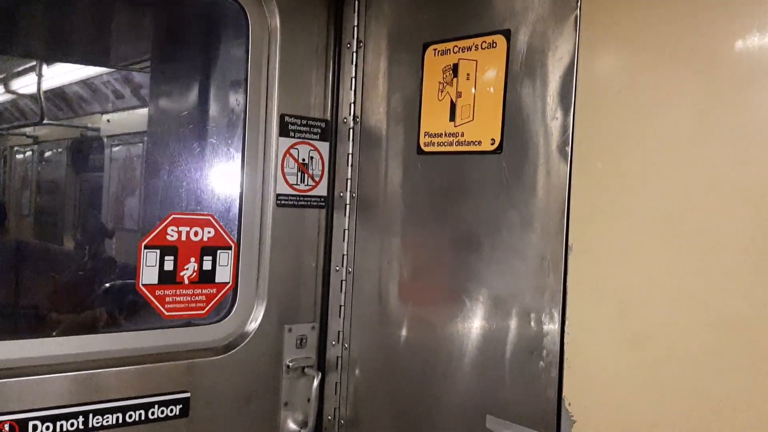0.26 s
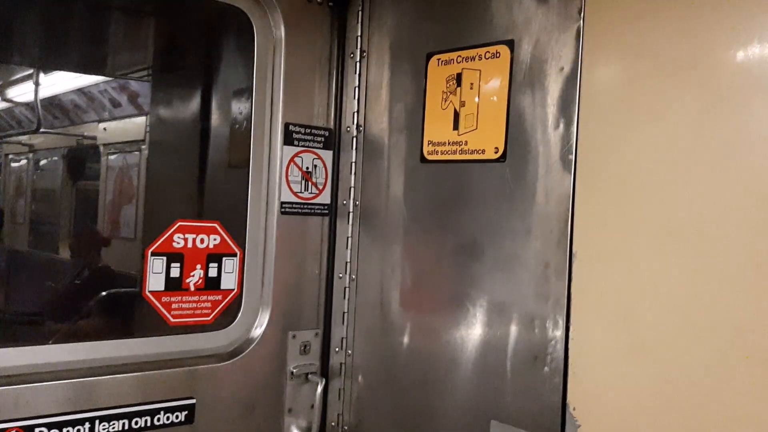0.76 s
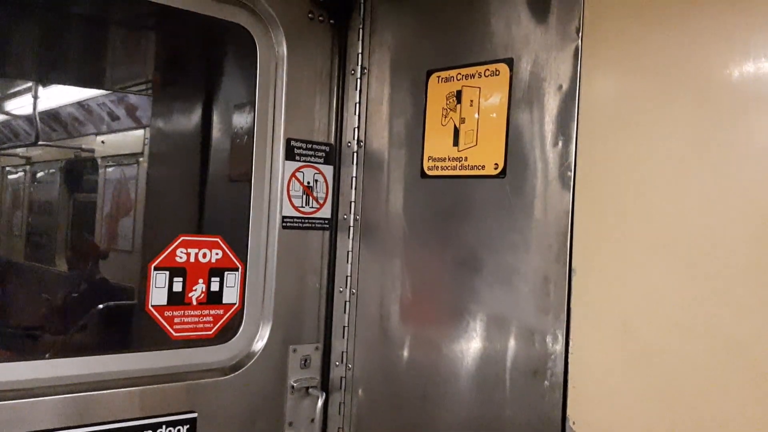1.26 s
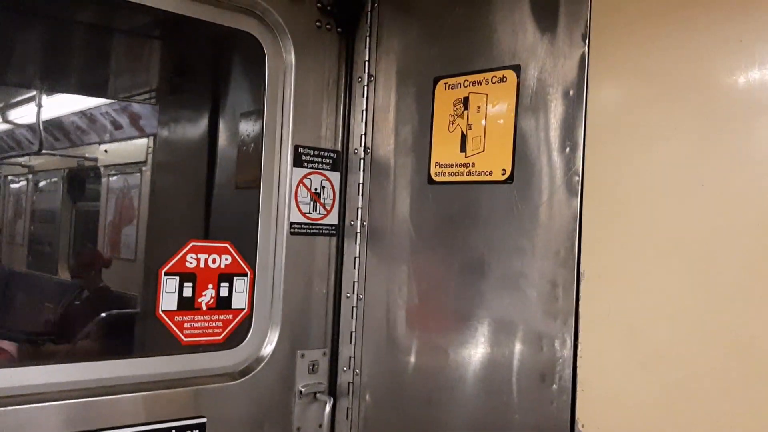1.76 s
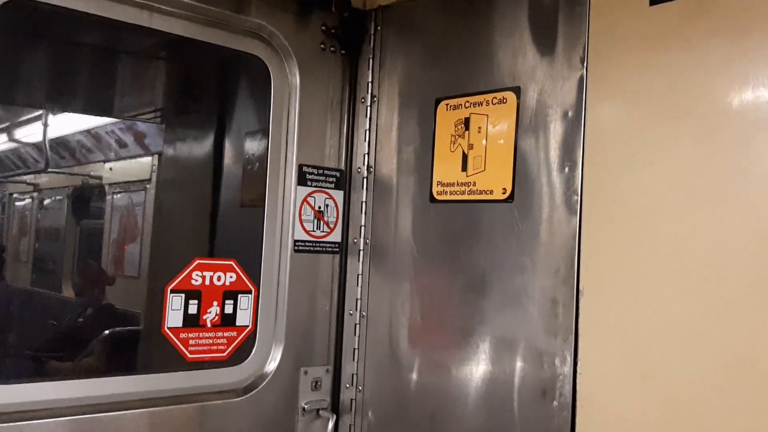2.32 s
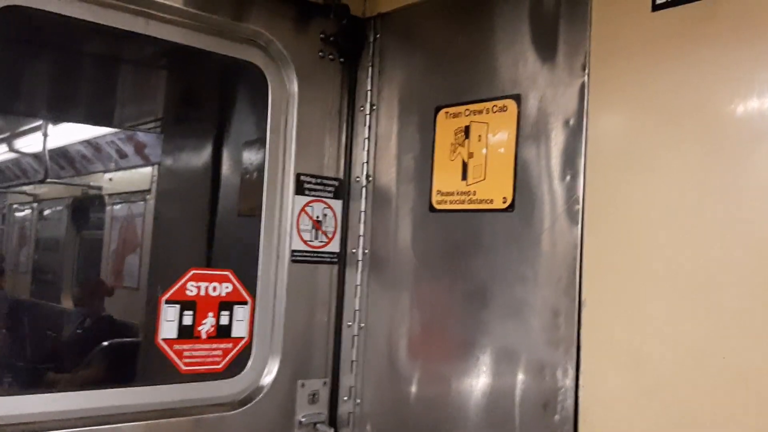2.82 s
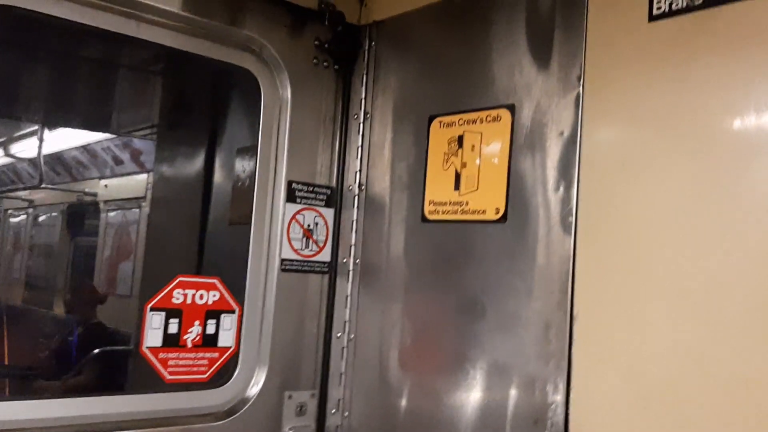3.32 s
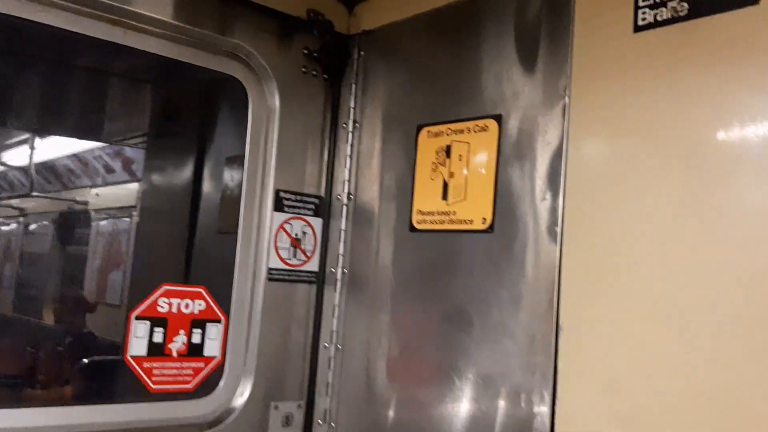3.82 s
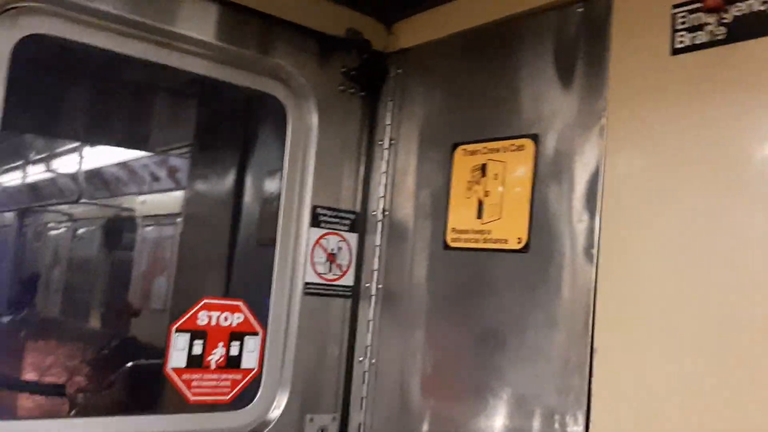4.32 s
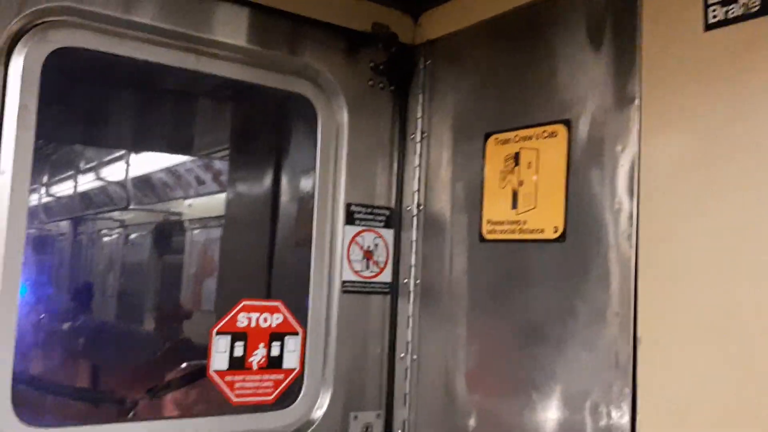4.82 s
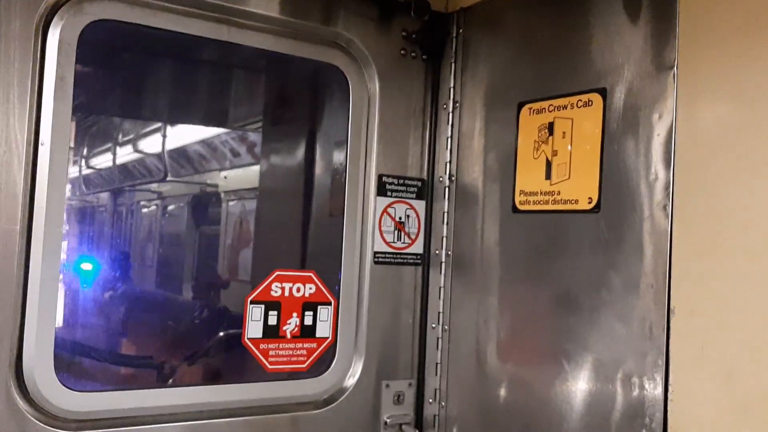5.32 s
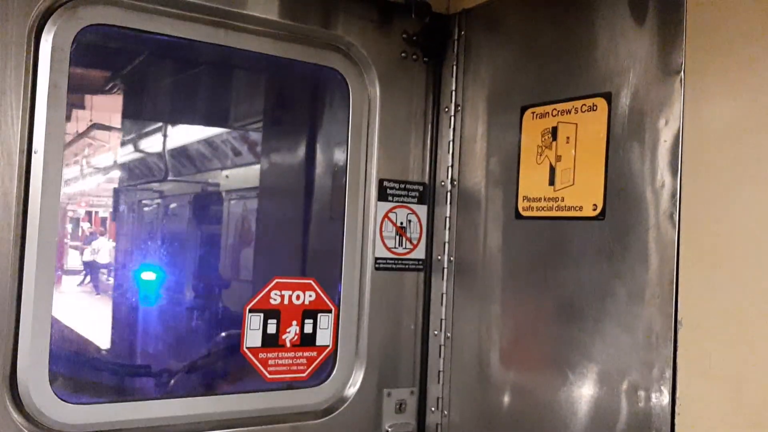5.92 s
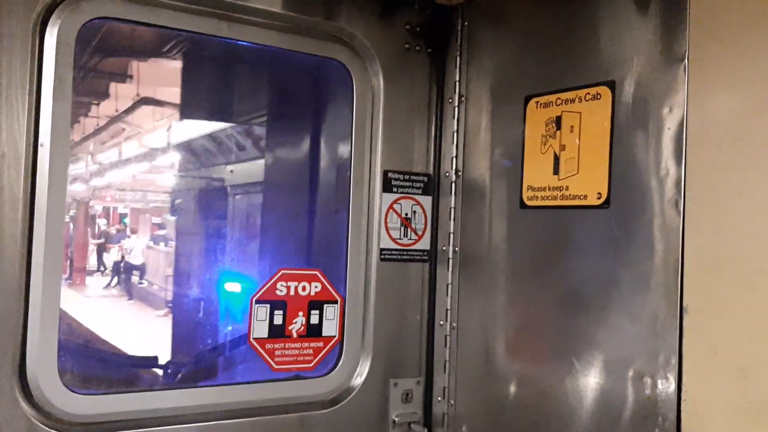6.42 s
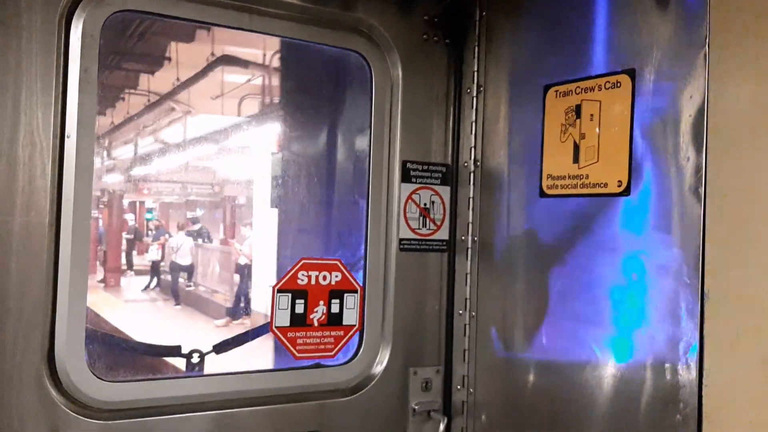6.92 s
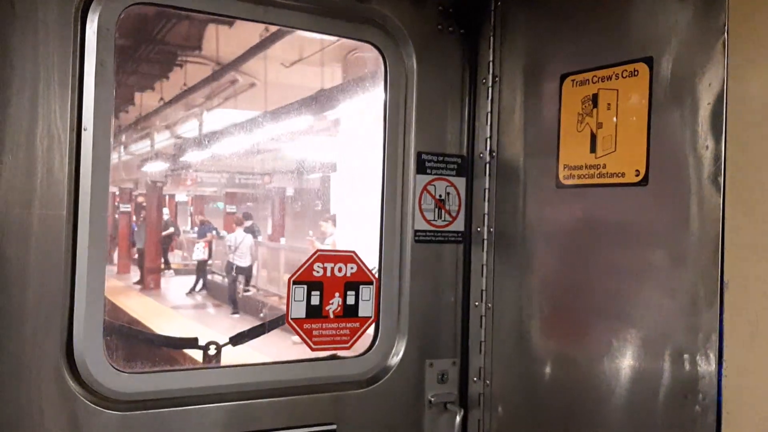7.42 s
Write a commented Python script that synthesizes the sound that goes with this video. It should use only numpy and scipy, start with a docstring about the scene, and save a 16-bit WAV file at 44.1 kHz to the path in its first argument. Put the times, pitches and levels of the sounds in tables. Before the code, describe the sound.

Inside a steel subway car by its end door, in wide stereo, a dense rumble runs throughout: deep sway, low axle drone, boomy body panels and mid-range rail roar. Over it lie a smooth ventilation hiss and thin high electric whines drifting between the ears. The first second is roughest: a hard double thump near 0.2 s, weaker blows at 0.5 and 0.8, another at 1.1, with ringing metal, rattles and a low unsteady groan from 0.3 to 1.0. A short rising groan follows around 1.3-1.4. Then the rail is smoother, with uneven surges and a hum near 1.9. A sharp spit of air and rattle comes at 1.7, light clicks and a tiny tick on the right near 3.2, another air spit at 4.3, a faint falling groan at 4.7 and a metallic rattle at 5.3. From about 5.4 the drone grows fuller entering the station, with brief hum pulses around 6.6-7.3, still rolling at 7.6.

```python
"""A deep rumble with joint thumps and groans, as heard by the end door of a steel subway car entering a station.
Filtered noise makes the car body's rumble, the tunnel roar and the ventilation hiss.
Joint blows gate noise and ring the bogie; gliding sines groan; steady sines whine in the power electronics.
Short noise bands make spits of air and rattling fittings; three dying sines make one sharp tick close on the right."""
import sys
import numpy as np
from scipy import signal
from scipy.fft import rfft, irfft, next_fast_len
from scipy.io import wavfile
from scipy.ndimage import uniform_filter1d

SR = 44100
rng = np.random.default_rng(int(sys.argv[2]) if len(sys.argv) > 2 else 0)


def log_audio(samples):
    """Write samples as a 16-bit WAV file to the path given in sys.argv[1]."""
    # one column per channel
    frames = np.atleast_2d(samples).T
    # limit to full scale, then quantise
    limited = np.clip(frames, -1, 1)
    pcm = np.round(limited * 32767).astype(np.int16)
    wavfile.write(sys.argv[1], SR, pcm)


N = 337806
TIME = np.arange(N) / SR  # seconds


def from_db(db):
    """Decibel law: 20 dB is a tenfold amplitude gain."""
    return np.exp(np.asarray(db) * (np.log(10) / 20))


def rms_one(x):
    """Power normalization: scale to a mean square of one."""
    return x / np.sqrt(np.mean(x ** 2) + 1e-20)


def in_time(rows):
    """Linear interpolation: each column of a timed table, read at every sample."""
    seconds, *columns = np.transpose(rows)
    return [np.interp(TIME, seconds, column) for column in columns]


def at_hz(points, hz):
    """Spectral interpolation: straight lines on a log-frequency axis."""
    point_hz, value = np.transpose(points)
    return np.interp(np.log(hz), np.log(point_hz), value)


def swells(rows):
    """Superposed bell-shaped gains in dB; each length is the width at half height."""
    gain_db = 0
    for peak_s, db, length in rows:
        widths = 2 * (TIME - peak_s) / length
        gain_db = gain_db + db * np.exp2(-np.minimum(widths ** 2, 20))
    return gain_db


def drift(rate):
    """Low-passed chance: a random curve of spread about 1, with two poles at `rate` Hz."""
    step = 100  # samples between points
    pole = np.exp(-2 * np.pi * rate * step / SR)
    chance = rng.standard_normal(N // step + 2002)
    slow = signal.lfilter([1], [1, -2 * pole, pole * pole], chance)[2000:]  # drop the filter's start
    return np.interp(np.arange(N) / step, np.arange(len(slow)), rms_one(slow))


# Resonances of car panels and ducts. Each row: frequency in Hz, width in Hz, peak gain in dB.
PANEL_RESONANCES = [(108.3, 6.3, 7.5), (160, 15, 2.5), (210, 22, 2), (1208, 12, 5.5), (1278, 8.8, 5),
                    (1540, 79, 4), (2042, 33, 6)]
# Likeness of the two ears. Each row: frequency in Hz, left-right correlation.
EAR_LIKENESS = [(60, 0.95), (99, 0.99), (160, 0.94), (270, 0.93), (450, 0.74), (740, 0.41), (1220, -0.014),
                (2010, -0.12), (3330, 0.12), (5500, -0.096), (9080, 0.045), (15000, 0.12)]
# Balance of the two ears. Each row: frequency in Hz, left minus right in dB.
EAR_BALANCE = [(50, 1), (140, 0), (1600, 0.5), (2100, 0.5), (2900, -3.5), (3900, -4.5), (5000, -1.5),
               (6600, 0.5), (7800, -4.5), (9500, -3), (11500, -9), (14000, 0.5)]


def cabin_noise(spectrum):
    """Random vibration through panel resonances: correlated ears in the bass, a diffuse field above."""
    size = next_fast_len(N)
    hz = np.maximum(np.fft.rfftfreq(size, 1 / SR), 1)
    panels_db = sum(db / (1 + (2 * (hz - f) / width) ** 2) for f, width, db in PANEL_RESONANCES)
    level_db = at_hz(spectrum, hz) + panels_db
    low_skirt = np.minimum(hz / spectrum[0][0], 1) ** 2
    high_skirt = np.minimum(spectrum[-1][0] / hz, 1) ** 3
    alike = np.clip(at_hz(EAR_LIKENESS, hz), -.99, .99)
    mid, side = rfft(rng.standard_normal((2, size)))
    sides = np.array([[1], [-1]])  # left, right
    pair = np.sqrt(1 + alike) * mid + sides * np.sqrt(1 - alike) * side
    pair = pair * from_db(sides * at_hz(EAR_BALANCE, hz) / 2)
    return rms_one(irfft(pair * from_db(level_db) * low_skirt * high_skirt, size)[:, :N])


def steadied(x, seconds):
    """Power leveling: divide a vibration by its running rms over `seconds`."""
    power = uniform_filter1d(np.mean(x ** 2, axis=0), max(int(seconds * SR), 1))
    return x / np.sqrt(power + 1e-9)


def burst(start, rise, t60):
    """Transient envelope: a linear rise, then an exponential decay of 60 dB in `t60` seconds."""
    age = TIME - start
    decay_db = -60 * np.maximum(age - rise, 0) / t60
    return np.clip(age / max(rise, 1e-4), 0, 1) * from_db(decay_db)


def bursts(rows, source):
    """Band-pass gating: each event lets its own band of the source through for a moment."""
    out = 0
    for start, db, rise, t60, low, high in rows:
        edges = [min(low, .9 * high), min(high, .45 * SR)]
        band = signal.butter(2, edges, "band", fs=SR, output="sos")
        out = out + from_db(db) * burst(start, rise, t60) * rms_one(signal.sosfilt(band, source))
    return out


# A bad stretch and then smooth rail. Each row: time in seconds, roughness in dB over smooth rail.
TRACK_ROUGHNESS = [(0, -1.5), (.19, 3.5), (.25, 3.5), (.62, 4), (.8, 1.5), (.92, 1), (1.02, -2.5),
                   (1.3, -.5), (2.33, -0.9), (3.2, .3), (5.0, -1.1), (5.5, -1.2), (6.2, 0.2), (7.66, -0.5)]


def track_db():
    """Rolling excitation: rougher rail drives the car harder."""
    return in_time(TRACK_ROUGHNESS)[0]


# Fixed resonances of the car body. Each row: frequency in Hz, width in Hz.
BODY_RESONANCES = [(215, 36), (275, 72), (335, 54), (400, 39), (465, 130)]


def wavering_modes(x, depth):
    """Varying modal excitation: each fixed body resonance swells and fades at random."""
    out = x
    for hz, width in BODY_RESONANCES:
        mode = signal.lfilter(*signal.iirpeak(hz, hz / width, fs=SR), x)
        out = out + depth * drift(5.0) * mode
    return out


# Spectrum of the body boom. Each row: frequency in Hz, relative level in dB per Hz.
BOOM_SPECTRUM = [(190, -35), (215, -10.5), (238, -8), (275, -1), (340, -3), (410, -2), (490, -8),
                 (580, -10.5), (800, -37.5)]
BOOM_DB = -25  # on smooth rail


def boom():
    """Forced panel vibration: rough rail drums the body, whose fixed resonances swell and fade at random."""
    drummed = wavering_modes(cabin_noise(BOOM_SPECTRUM), depth=0.2)
    return from_db(BOOM_DB + track_db()) * steadied(drummed, seconds=0.16)


# Spectrum of the rails' roar. Each row: frequency in Hz, relative level in dB per Hz.
ROAR_SPECTRUM = [(350, -7), (520, -4.5), (610, 2.5), (720, -0.5), (900, -1), (1080, -4), (1300, -3),
                 (1550, -7), (1800, -10.5), (2200, -11.5), (3200, -22)]
# Roar on the way to the station. Each row: time in seconds, level in dB.
ROAR_LEVEL = [(0, -28), (.19, -28.5), (.25, -28), (.55, -26), (1.02, -30.5), (2.05, -30.5), (3.05, -28),
              (4.0, -28.5), (4.85, -28), (4.96, -26.3), (5.1, -27.8), (6.3, -27.5), (7.66, -27.6)]


def roar():
    """Broadband rolling noise: the rails roar in the tunnel with a slight random flutter."""
    level_db, = in_time(ROAR_LEVEL)
    return from_db(level_db + 0.33 * drift(9.2)) * cabin_noise(ROAR_SPECTRUM)


# Spectrum of the axles' drone. Each row: frequency in Hz, relative level in dB per Hz.
DRONE_SPECTRUM = [(62, -19), (76, -7), (92, 1), (110, -1.5), (130, -2), (156, -6), (180, -26.5)]
# Drone over uneven rail. Each row: peak time in seconds, gain in dB (negative eases off), length in seconds.
DRONE_SURGES = [(.03, 8, 0.047), (.35, -1, .15), (.7, 5, 0.22), (.91, 4.5, .1), (1.11, 3, 0.087),
                (1.27, 3.5, 0.12), (1.85, -0.5, 0.14), (2.11, 3.5, 0.16), (2.34, 3, 0.09), (2.5, 4.5, .16),
                (2.87, -2, 0.12), (3.55, 1, .1), (3.85, -1.5, .15), (4.31, 5, 0.13), (4.87, -4, 0.086),
                (5.48, 5.5, 0.13), (5.8, 3, 0.16), (6.27, 4, 0.071), (6.47, -0.5, 0.16), (6.86, 2.5, 0.14),
                (7.07, -5, .08), (7.47, 2.5, .16)]
DRONE_DB, DRONE_FOLLOWS = -30, 0.43  # level on smooth rail, share of the track's roughness in dB
STATION_S, STATION_FADE_S, STATION_DRONE_DB = 5.45, .3, 2  # middle of the fade, its length, gain


def drone():
    """Narrow-band forced vibration: the axles drone with the rail, louder from the station's mouth on."""
    in_station = np.clip((TIME - STATION_S) / STATION_FADE_S + .5, 0, 1)
    level_db = DRONE_DB + DRONE_FOLLOWS * track_db() + swells(DRONE_SURGES)
    level_db = level_db + STATION_DRONE_DB * in_station
    return from_db(level_db) * steadied(cabin_noise(DRONE_SPECTRUM), seconds=0.16)


# Spectrum of the floor, between drone and boom. Each row: frequency in Hz, relative level in dB per Hz.
THRUM_SPECTRUM = [(128, -12.5), (152, 0.5), (172, -3.5), (195, -0.5), (220, -3), (255, -8), (290, -16.5)]
# Changing load on the wheels. Each row: peak time in seconds, gain in dB, length in seconds.
THRUM_SWELLS = [(.04, 5, .1), (.22, 6, .06), (1.85, 1.5, .15), (2.5, 1.5, .1), (2.88, -1, 0.14),
                (3.31, 4, .12), (3.65, 2, 0.48), (4.14, 6.5, .082), (4.42, 5.5, 0.078), (4.88, -1.5, .08),
                (5.06, 6, 0.19), (5.75, 1, 0.46), (6.4, 1.5, 1), (6.96, 7, 0.057), (7.18, 4.5, 0.1)]
THRUM_DB, THRUM_FOLLOWS = -30, 0.6  # level on smooth rail, share of the track's roughness in dB


def thrum():
    """Plate vibration: the floor swells and ebbs with the load on the wheels."""
    level_db = THRUM_DB + THRUM_FOLLOWS * track_db() + swells(THRUM_SWELLS)
    return from_db(level_db) * steadied(cabin_noise(THRUM_SPECTRUM), seconds=0.153)


# Spectrum of the sway. Each row: frequency in Hz, relative level in dB per Hz.
SWAY_SPECTRUM = [(22, -30), (30, -20), (40, -4), (52, -2.5), (65, -4.5), (78, -14), (95, -34)]
# Lurches on the springs. Each row: peak time in seconds, gain in dB (negative settles), length in seconds.
SWAY_LURCHES = [(.02, 13, .05), (.2, 2, .08), (.46, 3, .24), (.7, 0, .12), (1.44, 3, .15), (1.76, -6, .11),
                (2.1, -5, .14), (2.9, 2.5, .1), (3.56, 8.5, 0.17), (3.82, -6, .15), (4.47, -6, .09),
                (4.68, 6, .23), (5.62, 4.5, 0.086), (6.02, -4, .1), (6.24, 0, .08), (6.45, -2, .2),
                (6.85, -1, 0.17), (7.16, 4, .15), (7.42, 1, 0.15)]
SWAY_DB, SWAY_FOLLOWS = -31.5, 0.74  # level on smooth rail, share of the track's roughness in dB


def sway():
    """Mass on springs: rough rail sways the car in the deepest bass, with lurches."""
    level_db = SWAY_DB + SWAY_FOLLOWS * track_db() + swells(SWAY_LURCHES)
    return from_db(level_db) * steadied(cabin_noise(SWAY_SPECTRUM), seconds=0.12)


# Spectrum of the body's hum. Each row: frequency in Hz, relative level in dB per Hz.
HUM_SPECTRUM = [(270, -11), (300, 5.5), (345, 1.5), (395, -4.5), (440, -14)]
# Corrugated patches of rail. Each row: peak time in seconds, gain in dB, length in seconds.
CORRUGATIONS = [(1.36, 8, .11), (1.93, 13.5, 0.25), (2.5, 7, 0.11), (3.1, 8, 0.23), (3.58, 8.5, 0.22),
                (4.35, 2, .15), (4.65, 6, 0.07), (5.04, 8, 0.14), (6.3, 5, .18), (6.62, 14, .09),
                (6.98, 11, 0.085), (7.18, 11, 0.085), (7.34, 8, .1)]
HUM_DB = -38  # between the patches


def hum():
    """Corrugation excitation: patches of rail make the car body hum in a narrow band."""
    return from_db(HUM_DB + swells(CORRUGATIONS)) * steadied(cabin_noise(HUM_SPECTRUM), seconds=0.13)


# Spectrum of a wheel's blow on a joint. Each row: frequency in Hz, relative level in dB per Hz.
THUMP_SPECTRUM = [(40, -9), (110, 2), (210, 4), (400, -1), (620, 4), (850, -2), (1400, -8), (3500, -20),
                  (8000, -26)]
# Wheels over rail joints. Each row: start in seconds, level in dB, 60 dB decay in seconds.
RAIL_JOINTS = [(.005, -26, 0.093), (0.218, -16.5, 0.21), (.272, -23.5, 0.23), (.515, -27, 0.22),
               (.818, -27, .15), (1.088, -21.5, 0.18)]


def thumps():
    """Impact noise: each joint strikes a wheel, and the blow dies exponentially."""
    blows = sum(from_db(db) * burst(start, .012, t60) for start, db, t60 in RAIL_JOINTS)
    return blows * steadied(cabin_noise(THUMP_SPECTRUM), seconds=0.026)


# Ringing of the bogie frame. Each row: frequency in Hz, level in dB against the blow, 60 dB decay in seconds.
BOGIE_RINGS = [(201, -5, 0.39), (323, -5, .55), (391.5, -8, 0.53), (582, -11.5, .64), (767, -16.5, 0.62),
               (1300, -17, .36)]
BOGIE_BEND, BOGIE_SAG_S = .08, 0.62  # largest sharpening as a share of pitch, 60 dB time of the sag back


def bogie():
    """Modal ringing: joint blows excite the frame sharp, and it sags unsteadily as the wheel rolls on."""
    load = sum(from_db(db) * burst(start, 0.0066, BOGIE_SAG_S) for start, db, _ in RAIL_JOINTS)
    turns_per_hz = np.cumsum(1 + BOGIE_BEND * load / load.max()) / SR
    out = 0
    for hz, mode_db, t60 in BOGIE_RINGS:
        ringing = sum(from_db(db + mode_db) * burst(start, 0.012, t60) for start, db, _ in RAIL_JOINTS)
        phase = 2 * np.pi * hz * turns_per_hz + 0.9 * drift(7.9)
        out = out + np.sqrt(2) * ringing * np.sin(phase)
    return out


# One list per groan. Each row: time in seconds, pitch in Hz, rms level in dB, roughness (1 is full).
WHEEL_GROANS = [
    [(.28, 328.4, -44, 0.5), (.33, 330.4, -28, .77), (.4, 336, -36, 0.86), (.44, 349, -23, 0.5),
     (.5, 357.5, -31, 0.56), (.6, 336, -24.5, 1.03), (.66, 334, -24, 0.96), (.74, 340.6, -20.5, .25),
     (.79, 334.6, -40, .3), (.83, 339.2, -20, .2), (.93, 337, -26, 0.2), (.975, 286, -26, 0.26),
     (1.02, 278, -34, 0.4), (1.05, 280, -55, .16)],
    [(1.25, 334, -50, .6), (1.3, 357, -34, 0.8), (1.39, 397, -21.5, 0.1), (1.45, 394, -48, .4)],
    [(4.59, 420, -48, .4), (4.635, 401, -31, .15), (4.69, 332, -34, .4), (4.73, 315, -48, .5)],
]
GROAN_JITTER, GROAN_SHAKE_DB = 0.0387, 2.5  # rms at full roughness: share of the pitch, level swing


def groan(rows):
    """Frictional oscillation: wheels slip on the rail with a gliding low note, now rough, now clear."""
    hz, db, rough = in_time(rows)
    jittered_hz = hz * (1 + GROAN_JITTER * rough * drift(29.6))
    phase = 2 * np.pi * np.cumsum(jittered_hz) / SR
    level = np.sqrt(2) * from_db(db + GROAN_SHAKE_DB * rough * drift(28))
    sounding = (TIME > rows[0][0]) * (TIME < rows[-1][0])
    return level * np.sin(phase) * sounding


# Loose fittings shake. Each row: start in seconds, level in dB before the ear balance, rise in seconds,
# 60 dB decay in seconds, lower band edge in Hz, upper band edge in Hz.
RATTLE_EVENTS = [(.215, -29, .004, 0.22, 600, 4370), (.268, -37, .012, .25, 550, 2500),
                 (.45, -29, .06, 0.8, 1050, 3500), (.535, -36, .027, 0.71, 2800, 4350),
                 (.47, -43, 0.045, 1.4, 10000, 12200), (.7, -41, 0.031, .5, 1100, 4500),
                 (.82, -38, 0.05, .49, 1100, 4470), (1.088, -39, .0084, .25, 1500, 12000),
                 (1.695, -30.5, .01, .26, 2700, 4970), (3.155, -30.5, .001, .03, 1500, 9000),
                 (3.177, -27, .001, .02, 1200, 4000), (5.32, -29.5, .004, 0.23, 2830, 3800),
                 (5.32, -36, .006, .4, 2250, 2500), (5.321, -37, .002, .12, 3800, 13000),
                 (7.135, -36, .015, .18, 2800, 3400)]


def rattles(grain_db):
    """Random contact noise: dense uneven touches of loose metal, stronger on the right."""
    contacts = rng.standard_normal((2, N)) * from_db(grain_db * drift(84))
    return bursts(RATTLE_EVENTS, contacts) * from_db([[-2.2], [1.5]])


# Spits of air. Each row: start in seconds, level in dB before the ear balance, rise in seconds,
# 60 dB decay in seconds, lower band edge in Hz, upper band edge in Hz.
SPIT_EVENTS = [(0, -38, 0.0071, .6, 9500, 12500), (.08, -40, .04, .5, 10800, 15000),
               (1.693, -43, .002, 0.044, 3000, 13000), (1.693, -27.5, 0.0044, 0.39, 5500, 12900),
               (4.302, -30.5, .005, .45, 4000, 7600), (4.302, -34.5, .006, 0.52, 6700, 6900),
               (4.2995, -33, .003, 0.42, 10200, 13200), (4.85, -42, .09, .7, 11000, 14500)]


def air_spits(sputter_db):
    """Turbulent jet noise: short escapes of compressed air, sputtering slightly, stronger on the right."""
    jet = rng.standard_normal((2, N)) * from_db(sputter_db * drift(100))
    return bursts(SPIT_EVENTS, jet) * from_db([[-2.5], [1.5]])


# Ringing of the tick. Each row: frequency in Hz, level in dB before filter and ear balance,
# 60 dB decay in seconds.
TICK_RINGS = [(6500, -6, 0.0019), (7400, -2.5, 0.0022), (11300, -6, 0.0013)]
TICK_S = 3.1917


def tick():
    """Damped modal impact: a tiny hard contact close on the right, dead in about two milliseconds."""
    age = np.maximum(TIME - TICK_S, 0)
    ring = sum(from_db(db - 60 * age / t60) * np.sin(2 * np.pi * hz * age) for hz, db, t60 in TICK_RINGS)
    high_pass = signal.butter(4, 5000, "high", fs=SR, output="sos")
    thin = signal.sosfilt(high_pass, ring)  # too small to radiate lows
    return thin * from_db([[-40], [4]])


def tone(hz, waver_db, phase_wander, ear_lag):
    """Modulated line spectrum: level and phase wander at each ear, the right `ear_lag` radians late."""
    ears = []
    for ear in range(2):
        level = from_db(waver_db * drift(1.5))
        phase = 2 * np.pi * hz * TIME - ear * ear_lag + phase_wander * drift(0.9)
        ears.append(level * np.sin(phase))
    return rms_one(np.array(ears))


# Strong whines: one frequency in Hz each.
WHINE_PITCHES = [2929.5, 6798.5, 7149, 7499, 7850, 8088]
# One list per whine, in the same order. Each row: time in seconds, left level in dB, right level in dB.
WHINE_LEVELS = [
    [(0, -47, -50), (.3, -50, -40), (.55, -49, -42), (.8, -48, -41), (1.15, -54, -38), (1.9, -51, -41),
     (2.2, -50, -38.5), (2.5, -52, -42), (2.85, -55, -36.5), (3.15, -49, -38), (3.26, -51, -42),
     (3.55, -45, -43), (3.75, -37, -39), (4.15, -43, -33.5), (4.5, -48, -47), (4.85, -56, -43),
     (5.3, -51, -42), (5.65, -47, -53), (6.05, -43, -41), (6.3, -45, -41), (6.55, -51, -56),
     (6.95, -53, -48), (7.45, -47, -45), (7.66, -48, -48)],
    [(0, -58, -53), (.85, -48, -42), (1.3, -55, -48), (1.8, -66, -44), (2.15, -58, -58), (2.4, -46, -44),
     (2.75, -54, -58), (3.1, -54, -40), (3.4, -60, -48), (3.62, -62, -63), (3.9, -45, -47),
     (4.25, -46, -43), (4.6, -44, -68), (5.6, -53, -58), (6.35, -42.5, -60), (6.6, -51, -58),
     (6.85, -52, -55), (7.66, -44, -52)],
    [(0, -65, -55), (.7, -59, -48), (.95, -64, -56), (1.65, -60, -48), (2.45, -49, -43), (2.9, -60, -40),
     (3.4, -65, -59), (3.85, -62, -57), (4.15, -44, -51), (4.5, -59, -54), (5.1, -56, -39), (5.5, -61, -59),
     (5.9, -49, -54), (6.5, -56, -53), (6.75, -59, -45), (7.25, -61, -56), (7.66, -62, -40)],
    [(0, -62, -60), (1.3, -61, -50), (3.1, -64, -58), (3.6, -53, -51), (4.0, -63, -62), (5.4, -56, -60),
     (5.9, -49, -47), (6.3, -55, -56), (6.6, -47, -49), (7.66, -56, -55)],
    [(0, -63, -64), (1.4, -62, -54), (2.9, -67, -62), (5.0, -54, -55), (5.4, -64, -62), (5.7, -58, -51),
     (6.35, -55, -49), (6.6, -66, -60), (7.66, -59, -57)],
    [(0, -62, -65), (1.1, -60, -61), (1.55, -60, -47), (2.0, -66, -59), (2.45, -62, -46), (2.8, -64, -57),
     (3.9, -62, -56), (4.27, -56, -44), (4.5, -59, -54), (4.9, -60, -47), (6.9, -62, -58), (7.2, -61, -50),
     (7.55, -63, -42), (7.66, -63, -45)],
]
# In the same order: the right ear's lag in radians.
WHINE_LAGS = [1.54, 1.3, 1.9, 1.2, 1.7, 1.2]
# Weaker steady tones. Each row: frequency in Hz, level in dB before the ear balance.
WEAK_TONES = [(1205, -50), (3280, -60.5), (4220, -57), (4570, -64), (4920, -57.5), (5509, -57.5),
              (6212, -63), (6561, -63), (8199, -66), (8440, -50), (9378, -66)]


def electrics():
    """Standing waves: converter switching tones, many 350 Hz apart, swell and fade apart at each ear."""
    strong = 0
    for hz, levels, lag in zip(WHINE_PITCHES, WHINE_LEVELS, WHINE_LAGS):
        whine = tone(hz, waver_db=1.4, phase_wander=0.4, ear_lag=lag)
        strong = strong + from_db(in_time(levels)) * whine
    weak = sum(from_db(db) * tone(hz, waver_db=1.0, phase_wander=0.53, ear_lag=0.9) for hz, db in WEAK_TONES)
    return strong + weak * from_db([[-1.5], [1.2]])


# Spectrum of the hiss. Each row: frequency in Hz, relative level in dB per Hz.
HISS_SPECTRUM = [(900, -10.5), (2000, 2.5), (2900, 0.5), (3900, -1), (5200, -5), (6800, -3.5), (7600, -5.5),
                 (9500, -14), (11500, -12), (13000, -14), (14500, -21.5), (16000, -32)]
# Ventilation and wheel hiss. Each row: time in seconds, level in dB.
HISS_LEVEL = [(0, -32.5), (.85, -34.5), (1.2, -35.5), (1.9, -34), (2.4, -33.2), (3.7, -33.5), (5.6, -33.5),
              (6.3, -34), (7.66, -33)]
AIR_FLUTTER_DB = 0.96  # rms


def ventilation():
    """Turbulent flow noise: a smooth rush of air, with the wheels' hiss, flutters slightly."""
    air_db, = in_time(HISS_LEVEL)
    return from_db(air_db + AIR_FLUTTER_DB * drift(7.6)) * cabin_noise(HISS_SPECTRUM)


def scene():
    """Superposition: the sum of everything heard by the end door."""
    rumble = boom() + roar() + drone() + thrum() + sway() + hum()
    wheels = rumble + thumps() + bogie() + sum(groan(rows) for rows in WHEEL_GROANS)
    fittings = rattles(grain_db=3.5) + air_spits(sputter_db=0.5) + tick()
    return wheels + fittings + electrics() + ventilation()


def limiter(x, ceiling_db, release_db_per_s):
    """Peak limiting: peaks over the ceiling pull both channels down; the gain then creeps back."""
    over = np.maximum(20 * np.log10(np.abs(x).max(axis=0) + 1e-9) - ceiling_db, 0)
    ramp = release_db_per_s * TIME
    return x * from_db(ramp - np.maximum.accumulate(over + ramp))


PORT_NOTCH_HZ, PORT_WIDTH_HZ = 8617, 910  # of each of two equal notches
CUTOFF_HZ = 15800


def record(dry):
    """Port cancellation: the microphone port notches the treble; peaks are limited and the top is cut."""
    b, a = signal.iirnotch(PORT_NOTCH_HZ, PORT_NOTCH_HZ / PORT_WIDTH_HZ, fs=SR)
    ported = signal.lfilter(b, a, signal.lfilter(b, a, dry))
    held = limiter(ported, ceiling_db=-3.5, release_db_per_s=74)
    low_pass = signal.ellip(10, .1, 80, CUTOFF_HZ, fs=SR, output="sos")
    return signal.sosfilt(low_pass, held)


dry = scene()
out = record(dry)
log_audio(out)
```